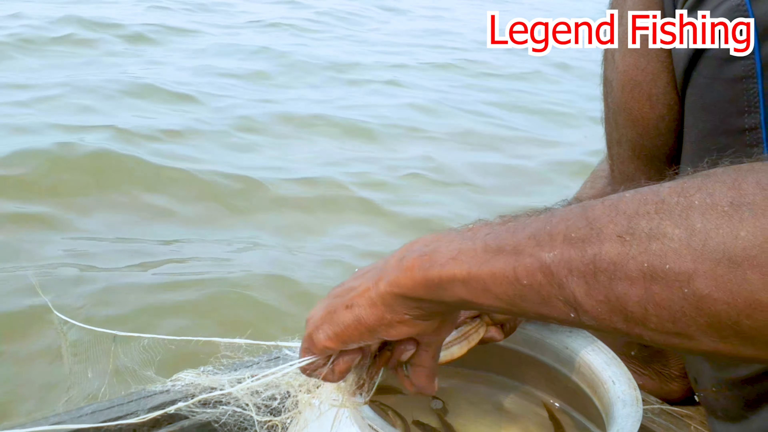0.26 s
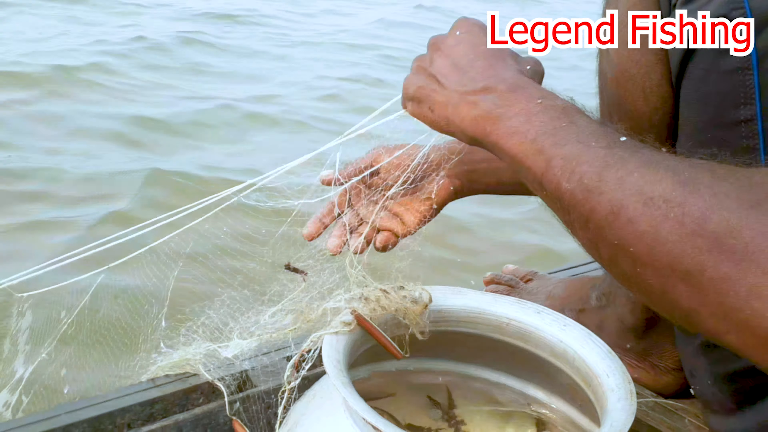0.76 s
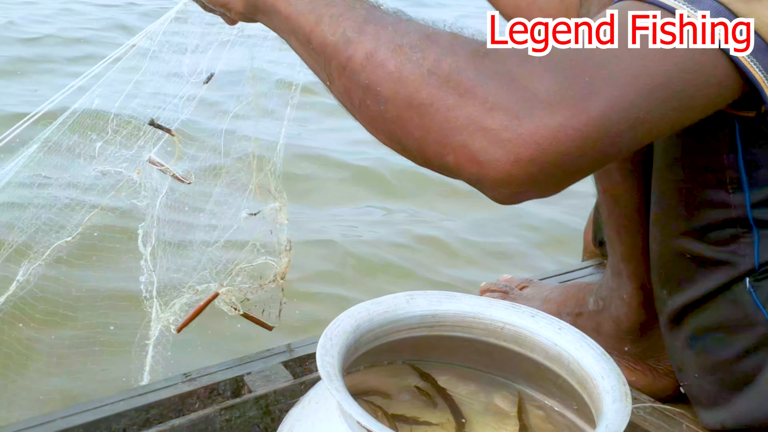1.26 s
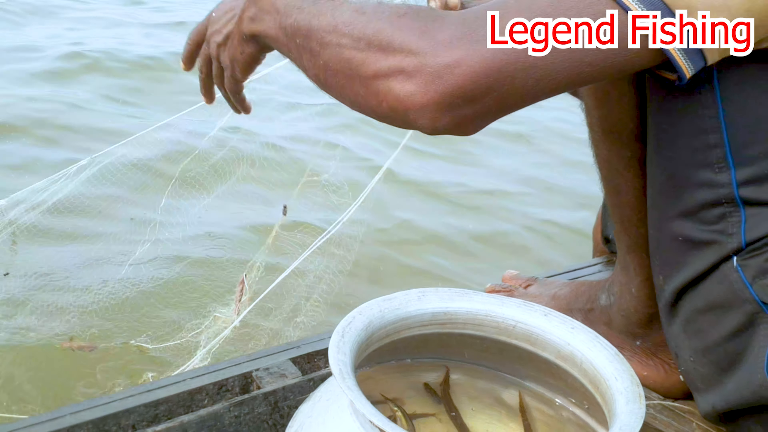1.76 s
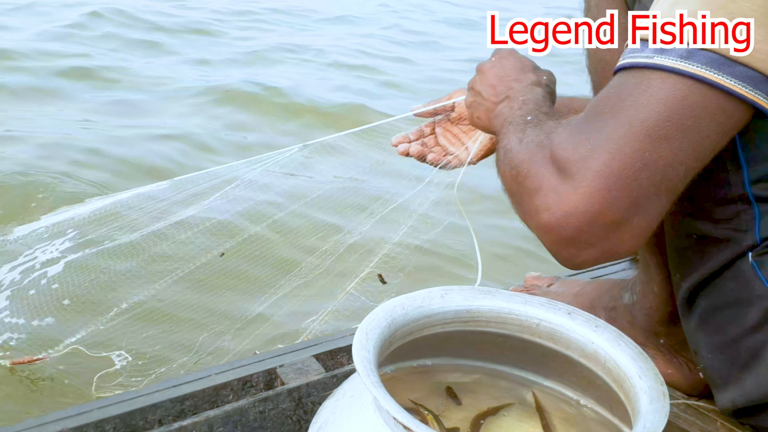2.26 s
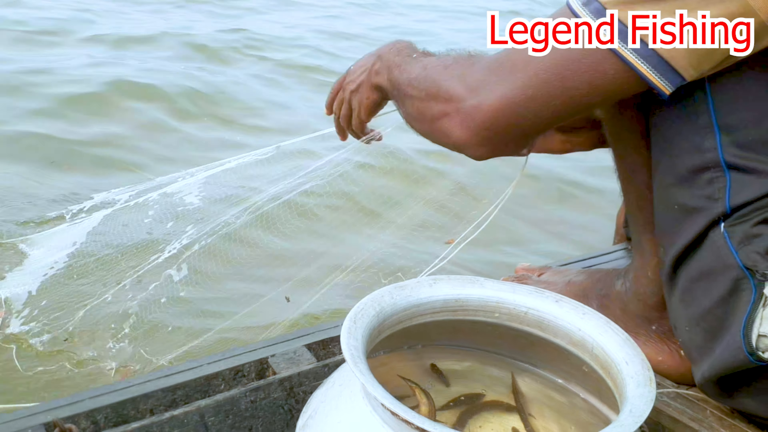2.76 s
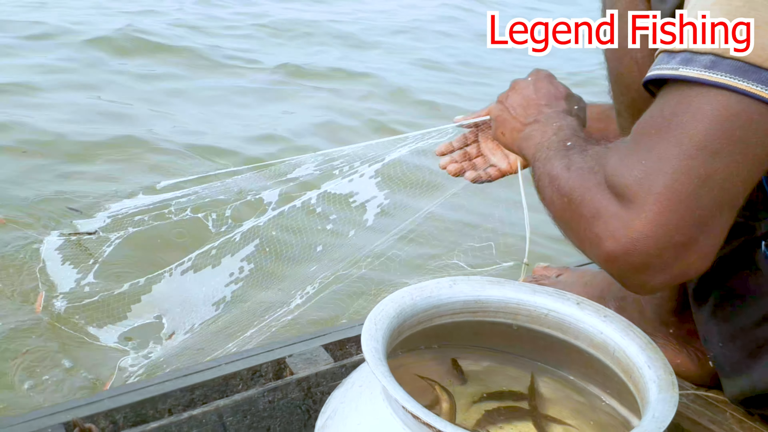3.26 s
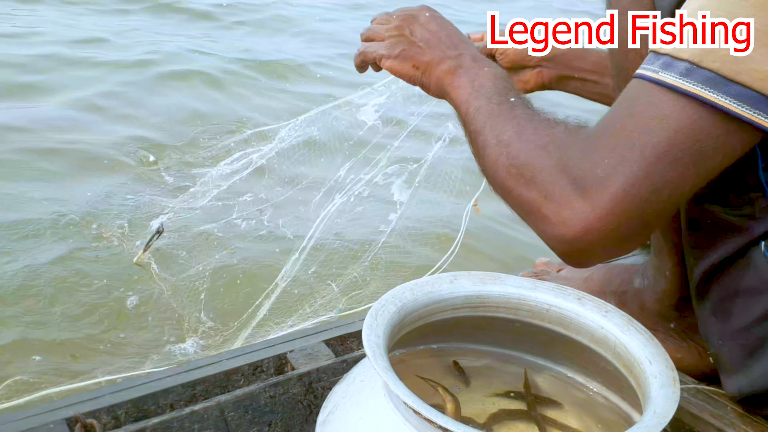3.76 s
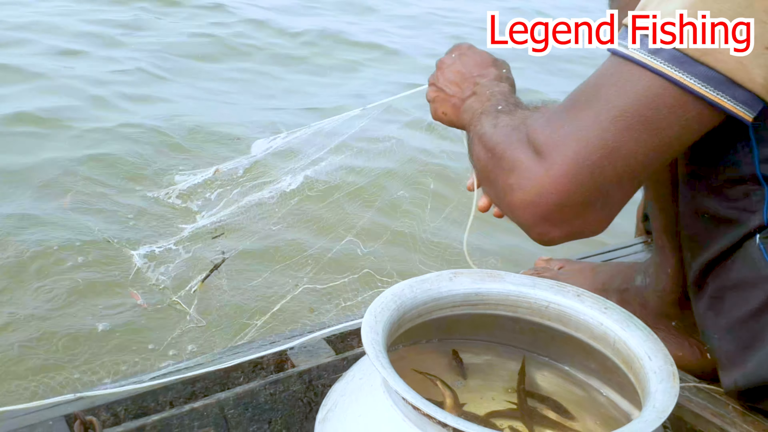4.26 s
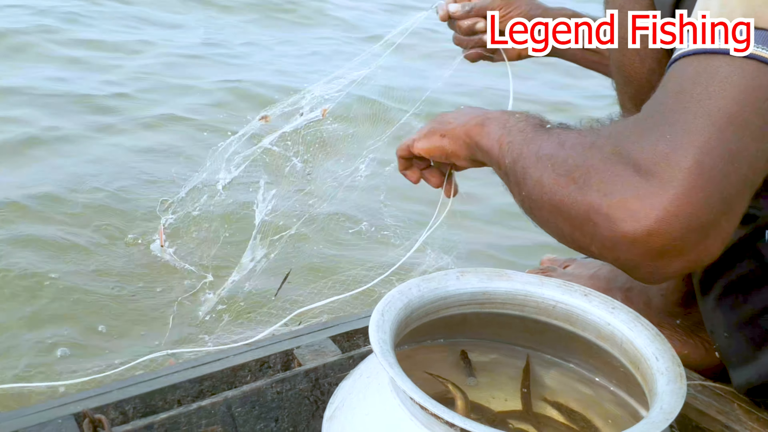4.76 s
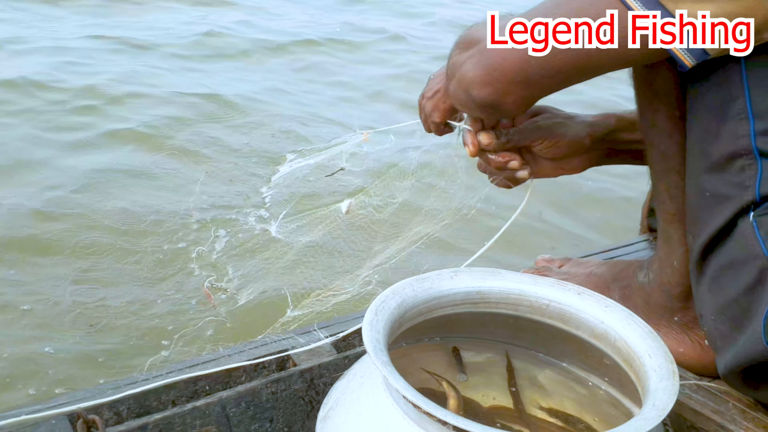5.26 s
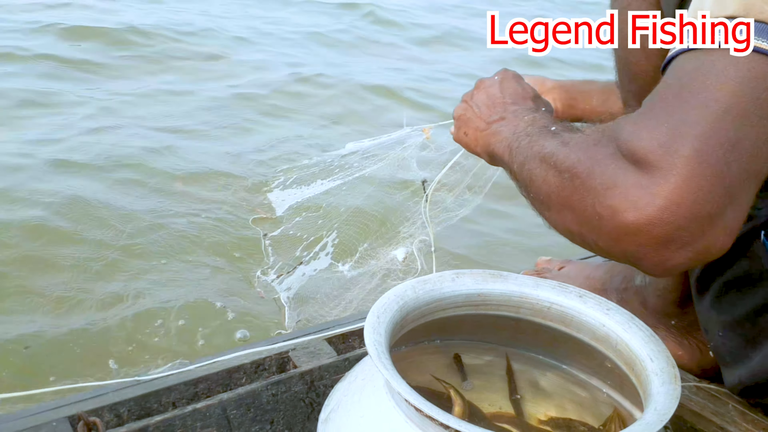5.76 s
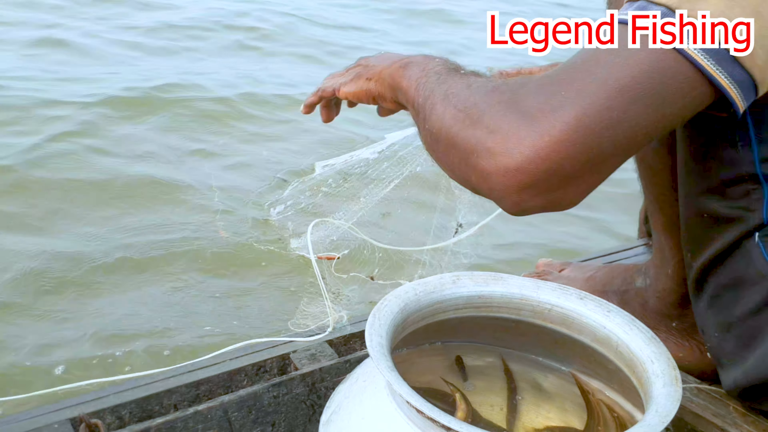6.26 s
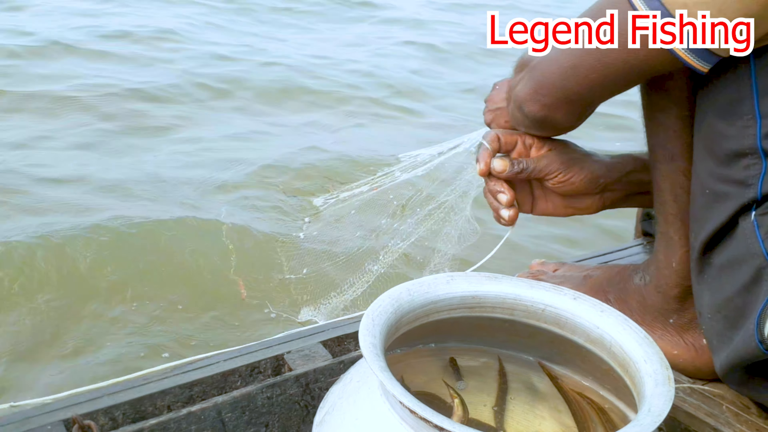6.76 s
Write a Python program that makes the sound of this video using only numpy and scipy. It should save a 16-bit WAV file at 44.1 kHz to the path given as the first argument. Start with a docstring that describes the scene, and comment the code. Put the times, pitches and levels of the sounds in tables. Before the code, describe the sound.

Wet fine mesh scrapes over a wooden boat edge and metal pot, then floats strike the pot in a bright, brief clatter. Hand-over-hand pulls follow as soft crackling swishes, mostly to the left, with small snaps, dull hull bumps, plank taps and watery plinks. The hauling thins towards the end. Close stereo microphone outdoors on open water, with low breeze buffeting mainly the left side.

```python
"""A wet nylon net is hauled hand over hand into a small wooden boat: filtered crackle swishes and rasps,
and a length of line hisses. Floats strike a metal pot and planks, heard as sums of damped modes, and the
hull bumps as a low damped swing. Drops and droplets ring in the water as decaying sine bubbles. A breeze
buffets two microphone ports as low coloured noise and rounded pulses."""
import sys
import numpy as np
from scipy import signal
from scipy.fft import rfft, irfft
from scipy.io import wavfile

SR = 44100
rng = np.random.default_rng(int(sys.argv[2]) if len(sys.argv) > 2 else 0)


def waveform_to_disk(signal):
    """Save audio, clipped to [-1, 1], as 16-bit WAV at the path in sys.argv[1]."""
    frames = np.transpose(np.atleast_2d(signal))
    scaled = np.clip(frames, -1, 1) * 32767
    samples = np.round(scaled).astype(np.int16)
    wavfile.write(sys.argv[1], SR, samples)


N = 308717
TIME = np.arange(N) / SR  # [s]

# Event levels are relative: the functions below add their own trims, and echoes where stated.
# Every pan is the left level minus the right level [dB].

# pulls of the mesh through the hands:
# (time of full speed [s], rise by about 60 dB [s], fall by about 60 dB [s], level [dB],
#  sizzle against that level [dB])
PULLS = [(.005, 0, 0.1949, -66.5, -2.5), (.24, 0.39, 0.64, -67, -3), (0.549, 0.06, 0.5529, -67.5, 2.5),
         (.68, 0.5, 1, -71.5, -3), (1.03, 0.1, .5, -61.5, -3), (1.149, 0.24, 0.38, -66.5, -1),
         (1.26, 0.1, 0.56, -75, 3.5), (1.49, 0.49, 0.43, -73.5, 1), (1.67, 0.29, .9, -72.5, -2.5),
         (2.09, 1.12, 2.5, -72, -14.5), (2.5, .5, 0.78, -69, -8), (2.87, 1.5, 3, -80.5, -6),
         (3.16, 1.03, 0.64, -76, -1), (3.56, 0.4066, 0.57, -70, -2.5), (3.81, 0.56, 0.83, -69, 1),
         (4.07, 0.03, 0.5, -75.5, -6.5), (4.21, .5, 1.32, -78, 0), (4.7, 0.44, 0.56, -68, -3.5),
         (4.99, 0.4668, 0.5, -66.5, -2), (5.2, 3, 2, -80.5, 3.5), (5.55, 5, 1, -84, 1.5),
         (6.2, 1.72, 1.06, -79.5, -1), (6.785, 0.2862, 0.26, -78.5, 7), (6.92, 1.9, 1.5, -84.5, -11.5)]
# spectrum of the mesh in the fingers: (frequency [Hz], level [dB])
SWISH_SPECTRUM = [(880, -35), (1500, -12.5), (1740, -17), (2370, -2.5), (3660, -10.5), (4370, -3),
                  (5300, -9), (6240, 0), (7610, -7.5), (9500, -3), (11000, -0.5), (12500, -5.5),
                  (16000, -22)]
# mesh dragging over the gunwale and the pot: (time [s], hold [s], level [dB])
DRAGS = [(.001, 0.0115, -42.5), (.085, 0.108, -70), (.218, 0.0051, -57.5), (.26, 0.031, -58),
         (.303, 0.0324, -53.5), (.366, 0.0053, -47.5), (.39, 0.063, -68.5), (.72, 0.0715, -67.5)]
# spectrum of the dragged mesh: (frequency [Hz], level [dB])
RASP_SPECTRUM = [(290, -36.5), (500, -20), (755, -14.5), (1010, -9.5), (1170, 5.5), (1390, 0), (2470, 4.5),
                 (3350, -6), (3670, 0.5), (5400, -11), (7530, -24.5), (12000, -27.5), (15600, -51.5),
                 (22000, -120)]
# a length of line running out: (time [s], hold [s], level [dB])
LINE_RUNS = [(1.77, 0.0336, -63)]
# spectrum of the running line: (frequency [Hz], level [dB])
LINE_SPECTRUM = [(1500, -26.5), (2500, -9), (4000, -12.5), (5300, -6.5), (7000, -36.5), (9000, -11),
                 (11500, -1.5), (13300, 0.5), (15000, -7), (16000, -8.5)]
# strands snapping free near the hands: (time [s], level [dB], centre frequency [Hz])
SNAPS = [(.5, -41, 9720), (.543, -34, 7150), (2.071, -41, 10800), (2.391, -46.5, 4770), (2.42, -29.5, 3016),
         (2.421, -42.5, 13100), (2.471, -44, 5880), (3.715, -37.5, 11200), (3.887, -50, 8950),
         (4.863, -40, 9800), (4.914, -45, 9500), (4.9198, -50, 11000), (4.9195, -52, 2600),
         (5.175, -48, 10240), (5.366, -51, 8000)]
# floats and weights striking:
# (time [s], level [dB], brightness [dB], share on the pot [0-1], relative skitter time [s])
KNOCKS = [(.002, -54, -18, 1, 0.12), (.301, -44.5, 28.5, 0.75, 0.1), (.325, -48, 22, 1, 0.099),
          (.361, -40.5, -5.5, 0.15, 0.24), (0.43, -47, -4.5, 0.02, 0.15), (.638, -26.5, -7.5, 0.81, 0.01),
          (0.6476, -19, 10.5, 0.82, 0.0061), (.650, -18.5, 22, 0.67, 0.009), (.657, -26.5, 8.5, 0.5, .012),
          (.69, -41, -11.5, 0.47, 0.34), (1.145, -33, 2.5, 0.01, 0.035), (1.152, -37, -2, 0, 0.065),
          (1.162, -38.5, -18, 0.05, 0.077), (1.171, -36, -10.5, 0.13, 0.034), (1.234, -49, -5, 0.11, 0.158),
          (1.894, -48, -1.5, 0, 0.13), (2.418, -38, 11.5, 0.03, 0.0053), (2.449, -50.5, 16.5, 0.3, 0.063),
          (2.719, -57, -8.5, 0.19, 0.4), (2.99, -62, -1.5, 0.04, 0.0875), (3.014, -57.5, 7.5, 0.14, 0.52),
          (3.424, -57, -5, 0.11, 0.22), (3.764, -57.5, -7.5, 0.27, 0.57), (4.043, -53.5, 0.5, 0.17, 0.23),
          (5.316, -64.5, -2.5, 0.7, 0.18), (5.343, -53.5, 8, 0.36, 0.052)]
# modes of the aluminium pot: (frequency [Hz], mean level [dB], t60 [s])
POT_MODES = [(1128, -10, .21), (1308, -8, .19), (1522, -14, .08), (1638, -5, .09), (1765, 4.5, .1),
             (1870, -5, .09), (1980, -7, .13), (2030, -20, .36), (2464, -2, .08), (2518, -5, .07),
             (2789, -2, .08), (2872, -5, .09), (2960, -5, .05), (3054, -6, .11), (3229, -11, .14),
             (3335, -10, .19), (3640, -10, .05), (3851, -5, .08), (4480, -18, .1), (5685, -15, .06),
             (6342, -16, .09), (6480, -18, .07), (8520, -22, .04)]
# modes of planks and gunwale: (frequency [Hz], mean level [dB], t60 [s])
PLANK_MODES = [(735, -11, .06), (888, -9, .06), (1020, -6, .05), (1103, -2, .06), (1145, -2, .06),
               (1348, -8, .05), (1830, -12, .03), (2280, -3, .03), (2573, -1, .04), (2729, -3, .03),
               (3110, 0, .025), (3520, -6, .025), (3850, -8, .025), (4570, -14, .025)]
# dull bumps in the hull: (time [s], level [dB], frequency [Hz])
BUMPS = [(.303, -43.5, 196.8), (.363, -38, 228.4), (.384, -28.5, 129.8), (.432, -43, 246),
         (.535, -45.5, 269.8), (.581, -36, 108.6), (.648, -43, 220), (1.244, -41, 226), (1.252, -39, 125),
         (1.905, -38.5, 225), (1.919, -33.5, 106.3), (2.421, -46.5, 284.6), (2.722, -45, 263.6),
         (2.748, -36.5, 216.2), (2.96, -36.5, 118), (2.995, -41, 235.2), (3.425, -38.5, 173.6),
         (4.05, -42, 249.3), (4.288, -43, 239), (4.517, -44, 230)]
# big drops landing in the water: (time [s], initial bubble frequency [Hz], level [dB], relative t60 [s])
DROPS = [(.09, 3690, -56.5, 0.065), (.398, 2480, -51.5, .1), (0.542, 2252, -36, 0.0346),
         (1.334, 1439, -61.5, 0.13), (1.403, 3440, -59.5, 0.04), (1.643, 3081, -50, 0.139),
         (1.743, 1833, -57.5, 0.227), (2.21, 1107, -64, 0.096), (2.314, 2480, -59, 0.18),
         (2.321, 4380, -52.5, 0.115), (2.356, 2538, -54, 0.11), (2.423, 1330, -56.5, 0.245),
         (2.452, 2480, -54.5, 0.056), (2.563, 1540, -51.5, 0.082), (3.166, 1470, -65, 0.12),
         (3.407, 3919, -61, 0.092), (3.647, 4530, -53.5, 0.015), (3.772, 1230, -56, 0.098),
         (3.857, 4326, -52.5, 0.063), (4.052, 1549, -60.5, .09), (4.205, 3253, -55, 0.095),
         (4.286, 4544, -55.5, 0.02), (4.386, 960, -65, 0.16), (4.417, 981, -55.5, 0.131),
         (4.482, 3376, -65, 0.133), (4.814, 1264, -60, 0.147), (4.862, 4284, -45, 0.0076),
         (4.918, 1405, -57.5, 0.06), (5.089, 2769, -47.5, 0.062), (5.295, 3580, -59.5, 0.078),
         (5.635, 3954, -60.5, 0.077), (6.128, 2468, -49.5, 0.103), (6.167, 1584, -59.5, 0.19),
         (6.45, 1960, -62.5, 0.078), (6.589, 2591, -54.5, 0.085), (6.607, 1904, -62, 0.093),
         (6.774, 2178, -53.5, 0.082), (6.793, 1745, -65, 0.144), (6.882, 2217, -53.5, 0.094),
         (6.922, 2352, -65, 0.126)]
# showers of droplets from sheets of water and wet mesh:
# (time [s], length [s], level [dB], centre frequency [Hz], spread either way [octaves])
SHOWERS = [(0.206, 0.059, -54, 2073, 0.364), (0.297, 0.042, -41.5, 4150, 0.356),
           (0.324, 0.0922, -49, 2773, 0.588), (0.359, 0.036, -51, 3620, 0.55),
           (0.998, 0.077, -55, 2465, 0.488), (1.146, 0.037, -42.5, 3140, 0.593),
           (1.894, 0.0381, -53.5, 2610, 0.655), (2.325, 0.09, -55, 3370, 0.465),
           (2.43, 0.04, -47.5, 2900, 0.45), (2.501, .12, -59.5, 3210, 0.662),
           (2.987, 0.1256, -65, 2180, 1.043), (3.62, 0.153, -64, 3850, 0.73),
           (3.77, 0.107, -58.5, 3204, 0.806), (4.045, 0.07, -59.5, 3023, 0.675),
           (4.205, 0.046, -63.5, 3300, 0.36), (4.369, 0.144, -68, 2892, 0.56),
           (4.687, 0.142, -64.5, 3684, 0.58), (4.973, 0.048, -59, 3320, 0.654),
           (5.303, 0.074, -58.5, 3100, 0.36), (5.408, 0.0975, -67.5, 3214, 0.623),
           (6.194, 0.158, -65.5, 1908, 0.178), (6.92, 0.0783, -67.5, 2400, 0.33)]
# water running off each lifted armful: (time [s], hold [s], level [dB])
LIFTS = [(.55, 0.072, -68.5), (1.17, 0.132, -78.5), (1.82, 0.093, -75), (2.42, 0.149, -82),
         (5.35, 0.056, -95), (6.18, 0.12, -87.5)]
# spectrum of the trickling wash: (frequency [Hz], level [dB])
TRICKLE_SPECTRUM = [(400, -19.5), (600, -1.5), (1100, -3), (1700, -8.5), (2400, -3), (3200, -18),
                    (4400, -13), (7000, -24), (12000, -24.5)]
# a drop hits the right microphone port: (time [s], level [dB], swing frequency [Hz], t60 [s])
PORT_HIT = (1.7838, -21, 400, .006)
# single eddies thumping the left port: (time [s], level [dB], frequency [Hz])
BUFFETS = [(1.189, -32.5, 127), (1.444, -30.5, 78.4), (2.437, -31.5, 103.3), (2.747, -28, 106.8),
           (4.293, -31, 102.9), (4.514, -33.5, 154), (5.032, -30.5, 106.4), (6.113, -36, 139.5),
           (6.689, -27.5, 94), (6.828, -25.5, 88.6), (6.922, -27.5, 89.7)]
# strength of the breeze at the exposed left port: (time [s], level [dB])
BREEZE = [(0.0, -50), (0.25, -52), (0.36, -41), (1.09, -54), (1.66, -42), (1.77, -49.5), (2.34, -45),
          (2.61, -50.5), (2.97, -42), (3.37, -42), (3.51, -48), (3.65, -42), (4.93, -50), (5.03, -38.5),
          (5.55, -59.5), (5.96, -55.5), (6.1, -46), (7.0, -38)]
# spectrum of the breeze: (frequency [Hz], level [dB])
BREEZE_SPECTRUM = [(13, -54), (22, -35.5), (30, -20), (46, -2), (65, 3.5), (88, 4), (237, -12), (328, -22),
                   (401, -23.5), (515, -36.5), (900, -50.5), (1170, -74.5), (1980, -120)]
# spectrum of the microphone hiss: (frequency [Hz], level [dB])
HISS_SPECTRUM = [(1000, -10.5), (7000, -9.5), (10000, -7), (12500, 0), (16000, -1)]

HANDS_PAN_DB = 21


def net():
    """Stick-slip friction: knots tick through the fingers as a swish and rasp where they drag on the boat."""
    fine = grains(rate=2500, spread_db=0, lo_hz=1300, hi_hz=13000, wander_db=2.5, wander_rate=28, count=8)
    fine = unit(colour(fine, SWISH_SPECTRUM))

    # the thicker cord rubs lower, and sings in a narrow band as it slides
    rub = unit(band(crackle(rate=3000, spread_db=1.5), 1900, 5000, order=3))
    rub = rub * undb(-9 + 1.7 * walk(25))
    song = unit(band(crackle(rate=1200, spread_db=3), 2050, 2700))
    song = song * undb(-12 + 3 * walk(14))
    swish = fine * sides(HANDS_PAN_DB) + rub + song
    swish = swish * undb(hauling() + 2.5 + 1.6 * walk(65))

    # the finest threads sizzle at the very top
    sizzle = unit(band(crackle(rate=6100, spread_db=0.5), 11300, 14000, order=3)) * sides(14.5)
    sizzle = sizzle * undb(hauling(sizzle=0.997) + 2 + 1.2 * walk(50))

    knots = grains(rate=1600, spread_db=2.8, lo_hz=500, hi_hz=12000, wander_db=2.5, wander_rate=35, count=7)
    knots = knots * undb(walk(110))
    rasp = unit(colour(boat(knots, t60=0.035, wet_db=-2), RASP_SPECTRUM))
    # the dragged mesh also makes the pot sing
    pot_response = ring(POT_MODES, TIME[:SR // 5])
    pot_song = unit(signal.fftconvolve(knots, pot_response, axes=1)[:, :N])
    rasp = rasp + undb(-12) * pot_song
    return swish + sizzle + rasp * undb(strokes(DRAGS, attack_s=0.051, t60=0.14))


def hauling(sizzle=0):
    """Superposed powers: each pull swells and dies over slack mesh; sizzle weights the sizzle column [dB]."""
    slack_db = -95.5
    power = undb(slack_db) ** 2
    for s, rise, fall, db, sizzle_db in PULLS:
        away = np.clip(np.maximum((s - TIME) / rise, (TIME - s) / fall), 0, 2)
        gain = undb(db + sizzle * sizzle_db) * fade(away, 0.99)
        power = power + gain ** 2
    return 10 * np.log10(power)


def line():
    """Friction noise: dense clicks of fast-running thin line merge into a hiss, brightest at the very top."""
    hiss_of_line = unit(colour(crackle(rate=6600, spread_db=-0.5), LINE_SPECTRUM))
    level_db = strokes(LINE_RUNS, attack_s=0.26, t60=0.593) + 1.5
    return hiss_of_line * sides(-4) * undb(level_db)


def snaps():
    """Release of tension: a taut strand slips off a knot with a short burst of band-passed noise."""
    out, t = np.zeros((2, N)), TIME[:SR // 20]
    for s, db, hz in SNAPS:
        burst = rng.standard_normal((2, len(t))) * fade(t, 0.00356)
        tick = band(burst, 0.84 * hz, 1.12 * hz, order=1)
        add(out, s, tick, db + 0.5, pan_db=13.5)
    return boat(out, t60=0.047, wet_db=-8.5)


def spray():
    """Bubble resonance: bursting water films in the mesh give tiny high ticks that follow the hauling."""
    hauling_db = hauling()
    out, count = np.zeros((2, N)), 900
    for when, pitch, size in rng.random((count, 3)):
        hz = 4600 * 2.8 ** pitch
        t60 = (6 + 14 * size) / hz  # decay counted in cycles
        db = 0.7 * hauling_db[int(when * N)] - 22.5 + 15 * size ** 5
        add(out, when * TIME[-1], bubble(hz, t60, glide=0.04), db, HANDS_PAN_DB)
    return boat(out, t60=0.03, wet_db=-2)


def knocks():
    """Modal impact: each blow skitters in tiny bounces that crack, ring pot or planks and blur weak modes."""
    pot_pan_db, plank_pan_db, crack_pan_db, bright_pan_db = 3, -1.5, 14, 2
    out, t = np.zeros((2, N)), TIME[:SR // 2]
    for s, db, bright_db, share, skitter in KNOCKS:
        share = np.clip(share, 0, 1)
        crack = rng.standard_normal((2, len(t))) * fade(t, 0.018)
        crack = band(crack, 1200, 13000, order=1) * sides(crack_pan_db)

        # weak modes blur into an uneven tail
        flutter = undb(2.6 * walk(160)[:len(t)])
        blur = band(rng.standard_normal((2, len(t))), 1100, 3200, order=4)
        blur = blur * fade(t, 0.083) * flutter

        modes = share * ring(POT_MODES, t) + (1 - share) * undb(2) * ring(PLANK_MODES, t)
        blow = modes + undb(-3) * crack + undb(4.5 - 2.3 * share) * blur
        treble = band(blow, 2900, 10000, order=1) * sides(bright_pan_db)
        blow = band(blow, 200, 2600) + undb(bright_db) * treble

        # sparse weak impulses follow the first impact
        bounces = 0.047 * rng.standard_normal(len(t)) * (rng.random(len(t)) < 2200 / SR)
        bounces = bounces * fade(t, 0.73 * skitter)
        bounces[0] = 1
        sound = signal.fftconvolve(blow, bounces[None], axes=1)
        add(out, s, sound, db + 3, share * pot_pan_db + (1 - share) * plank_pan_db)
    return boat(out, t60=0.041, wet_db=-10)


def bumps():
    """Damped oscillation: a soft push swings the hull for a few cycles and leaves its boards shuddering."""
    out, t = np.zeros((2, N)), TIME[:SR // 6]
    for s, db, hz in BUMPS:
        swing = -np.sin(2 * np.pi * hz * t) * fade(t, 0.04)
        shudder = unit(band(rng.standard_normal(len(t)), 120, 342.7, order=3))
        shudder = shudder * fade(t, 0.07) * undb(-7) / 2
        soft_onset = 1 - np.exp(-t / 0.006)
        add(out, s, (swing + shudder) * soft_onset, db + 1, pan_db=0)
    return band(out, 82, 880, order=1)


def drops():
    """Bubble resonance: big drops ring with sinking pitch inside a wet splat and throw up droplets."""
    out, t = np.zeros((2, N)), TIME[:SR // 5]
    for s, hz, db, t60 in DROPS:
        splat = band(rng.standard_normal((2, len(t))), 0.9 * hz, 1.1 * hz) * fade(t, 1.6 * t60)
        splat = undb(-5) * splat / np.abs(splat).max()
        sound = bubble(hz, 0.75 * t60, glide=-0.06) + splat
        onset = 1 - np.exp(-t / 0.0015)
        pan_db = 0.09 + 1.5 * rng.standard_normal()
        add(out, s, sound * onset, db - 1, pan_db)
        add(out, s, droplets(length=0.042, hz=hz, octaves=0.4, count=16), db - 16, pan_db)
    return boat(out, t60=0.093, wet_db=-6.5)


def showers():
    """Droplet statistics: water shaken from the mesh spatters on planks and surface in bursts of bubbles."""
    out = np.zeros((2, N))
    for s, length, db, hz, octaves in SHOWERS:
        add(out, s, droplets(length, hz, octaves, count=70), db, pan_db=-1.5)
    return boat(out, t60=0.051, wet_db=-3)


def trickle():
    """Bubble resonance: droplets patter from the mesh over a wash of ripples, loudest around each lift."""
    ripple_db = -89
    drain_db = over(strokes(LIFTS, attack_s=0.735, t60=0.981), ripple_db)
    wash = unit(colour(crackle(rate=2100, spread_db=-1), TRICKLE_SPECTRUM))
    wash = wash * undb(drain_db + 4 + 2 * walk(31))
    out, count = np.zeros((2, N)), 80
    for when, pitch, size, side in rng.random((count, 4)):
        hz = 1800 * 3.6 ** pitch
        t60 = (30 + 70 * size) / hz  # decay counted in cycles
        db = drain_db[int(when * N)] - 3 + 12 * size ** 3
        add(out, when * TIME[-1], bubble(hz, t60, glide=0.11), db, pan_db=12 * (side - 0.4))
    return wash + boat(out, t60=0.06, wet_db=-4)


def bubble(hz, t60, glide):
    """Volume resonance: a trapped bubble rings and drifts in pitch by the fraction glide as it dies."""
    t = TIME[:SR // 5]
    pitch = hz * (1 + glide * (1 - np.exp(-t / 0.025)))
    phase = 2 * np.pi * np.cumsum(pitch) / SR
    onset = 1 - np.exp(-t * hz / 3)
    return np.sin(phase) * fade(t, t60) * onset


def droplets(length, hz, octaves, count):
    """Superposition: a burst of tiny bubbles of scattered pitch, the later ones weaker on average."""
    out, t = np.zeros(SR // 3), TIME[:SR // 30]
    for when, pitch, size in rng.random((count, 3)):
        f = min(hz * 2 ** (octaves * (2 * pitch - 1)), SR / 3)
        i = int(when * np.clip(length, 0, 0.29) * SR)
        gain = undb(12 * size ** 2 - 9 * when)
        out[i:i + len(t)] += gain * np.sin(2 * np.pi * f * t) * fade(t, 38 / f)
    return out / np.abs(out).max()


def port_hit():
    """Impulse response: a drop gives the diaphragm a sharp push and a quickly damped back swing."""
    s, db, hz, t60 = PORT_HIT
    out, t = np.zeros((2, N)), TIME[:SR // 50]
    swing = 1.1 * np.sin(2 * np.pi * hz * t) * fade(t, t60)
    push = np.exp(-t / 0.00015) - swing
    add(out, s, band(push, 60, 4500), db, pan_db=-24)
    return out


def buffets():
    """Eddy pressure: suction, push and suction again as a rounded pulse with no sharp edge."""
    out = np.zeros((2, N))
    for s, db, hz in BUFFETS:
        cycles = hz * TIME[:SR // 15] - 1.75
        pulse = np.cos(2 * np.pi * cycles) * np.exp(-(cycles / 0.632) ** 2)
        add(out, s - 1 / hz, pulse, db + 0.5, pan_db=31.5)
    return out


def breeze():
    """Turbulence: eddies hit each port on its own, the sheltered right more evenly, over a shared rumble."""
    windward_trim_db, lee_db, lee_follow = 0.5, -47.5, 0.13
    rumble_db, rumble_follow = -55, 0.26
    s, levels = np.transpose(BREEZE)
    db = np.interp(TIME, s, levels)
    gust_db = db - db.mean()
    ports_db = np.array([db + windward_trim_db, lee_db + lee_follow * gust_db])
    eddies = rng.standard_normal((2, N)) * undb(4.2 * np.array([walk(28), walk(28)]))
    own = unit(colour(eddies, BREEZE_SPECTRUM))
    shared = unit(band(colour(rng.standard_normal(N), BREEZE_SPECTRUM), 190, 760, order=1))
    wind = undb(ports_db) * own + undb(rumble_db + rumble_follow * gust_db) * shared
    return band(wind, 43, 3600, order=3)


def hiss():
    """Self-noise: faint steady coloured noise, independent in the two microphones."""
    return unit(colour(rng.standard_normal((2, N)), HISS_SPECTRUM)) * undb(-85)


def strokes(table, attack_s, t60):
    """Superposed powers [dB]: movements swell, hold and die away, by 60 dB in attack_s and in t60."""
    power = 1e-14  # keeps the logarithm finite
    for s, hold, db in table:
        swell = fade(np.maximum(s - TIME, 0), attack_s)
        decay = fade(np.maximum(TIME - s - hold, 0), t60)
        power = power + (undb(db) * swell * decay) ** 2
    return 10 * np.log10(power)


def over(db, rest_db):
    """Power sum: a level on top of a steady one."""
    return 20 * np.log10(np.hypot(undb(db), undb(rest_db)))


def grains(rate, spread_db, lo_hz, hi_hz, wander_db, wander_rate, count):
    """Subband modulation: crackle in neighbouring bands swells separately, so the colour keeps shifting."""
    edges = np.geomspace(lo_hz, hi_hz, count + 1)
    total = 0
    for lo, hi in zip(edges, edges[1:]):
        total = total + band(crackle(rate, spread_db), lo, hi) * undb(wander_db * walk(wander_rate))
    return total


def crackle(rate, spread_db):
    """Shot noise: random clicks of uneven size, rate per second, simultaneous at both ports."""
    size = undb(spread_db * np.minimum(rng.exponential(size=N), 4))
    struck = rng.random(N) < rate / SR
    return unit(struck * size * rng.standard_normal((2, N)))


def ring(modes, t):
    """Modal superposition: damped sines, shared out differently to the two ports at every blow."""
    hz, db, t60 = np.transpose(modes)[:, :, None]
    turn = rng.random((len(hz), 1)) + 0.069 * rng.standard_normal((2, len(hz), 1))  # phase [cycles]
    gain = undb(db + 2 * rng.standard_normal(turn.shape))
    return np.sum(gain * fade(t, t60) * np.sin(2 * np.pi * (hz * t + turn)), axis=1)


def boat(x, t60, wet_db):
    """Reverberation: quick reflections between the planks, the pot and the water."""
    t = TIME[:SR // 5]
    echoes = rng.standard_normal((2, len(t))) * fade(t, t60) * (t > 0.001)
    echoes /= np.sqrt(np.sum(echoes ** 2, axis=1, keepdims=True))
    return x + undb(wet_db) * signal.fftconvolve(x, echoes, axes=1)[:, :N]


def across(x):
    """Path difference: the sound reaches the right port a little after the left."""
    lag_s = 0.00009
    lag = np.exp(-2j * np.pi * np.fft.rfftfreq(N, 1 / SR) * lag_s)
    return np.array([x[0], irfft(rfft(x[1]) * lag, N)])


def add(out, s, sound, db, pan_db):
    """Superposition: place a peak-scaled sound at its time, level and side."""
    i = max(int(s * SR), 0)
    sound = sound / np.abs(sound).max() * undb(db) * sides(pan_db)
    out[:, i:i + sound.shape[1]] += sound[:, :N - i]


def sides(pan_db):
    """Level difference: left and right gains of mean power 1."""
    gains = undb(np.array([[0.5], [-0.5]]) * pan_db)
    return gains / np.sqrt((undb(pan_db) + undb(-pan_db)) / 2)


def colour(x, points):
    """Spectral weighting: filter by (frequency [Hz], level [dB]) points joined on a log-frequency axis."""
    hz, db = np.transpose(points)
    f = np.maximum(np.fft.rfftfreq(x.shape[-1], 1 / SR), 1)
    gain = undb(np.interp(np.log(f), np.log(hz), db))
    return irfft(rfft(x) * gain, x.shape[-1])


def band(x, lo_hz, hi_hz, order=2):
    """Causal filtering: a Butterworth band-pass."""
    edges = [lo_hz, min(hi_hz, SR / 2.1)]
    return signal.sosfilt(signal.butter(order, edges, "band", fs=SR, output="sos"), x)


def walk(rate):
    """Random modulation: normal values, rate per second, joined by lines and scaled to rms 1."""
    return unit(np.interp(TIME * rate, np.arange(2048), rng.standard_normal(2048)))


def fade(t, t60):
    """Exponential decay: the level falls 60 dB in t60."""
    return np.exp(-np.log(1000) * t / t60)


def undb(db):
    """Logarithmic level: decibels to amplitude gain."""
    return 10 ** (np.asarray(db) / 20)


def unit(x):
    """Normalisation: scale to rms 1."""
    return x / np.sqrt(np.mean(x ** 2))


def scene():
    """Linear superposition: net and line, blows on the boat, water, breeze and hiss."""
    mesh = net() + line() + snaps()
    hull = across(knocks()) + bumps()
    water = across(drops() + showers()) + trickle() + spray() + port_hit()
    wind = breeze() + buffets()
    return mesh + hull + water + wind + hiss()


def record(dry):
    """Band limiting: a steep elliptic low-pass removes the treble above 15950 Hz."""
    return signal.sosfilt(signal.ellip(10, 0.2, 70, 15950, fs=SR, output="sos"), dry)


dry = scene()
out = record(dry)
waveform_to_disk(out)
```